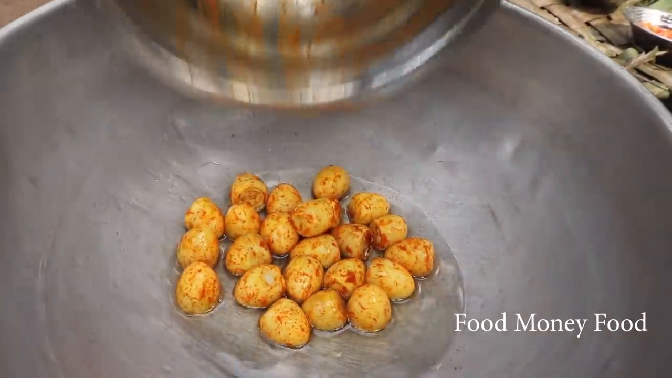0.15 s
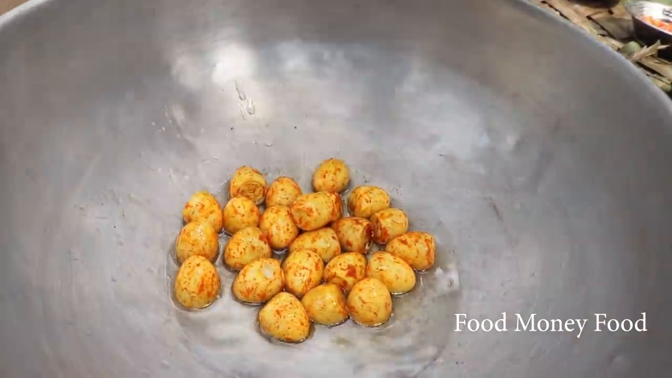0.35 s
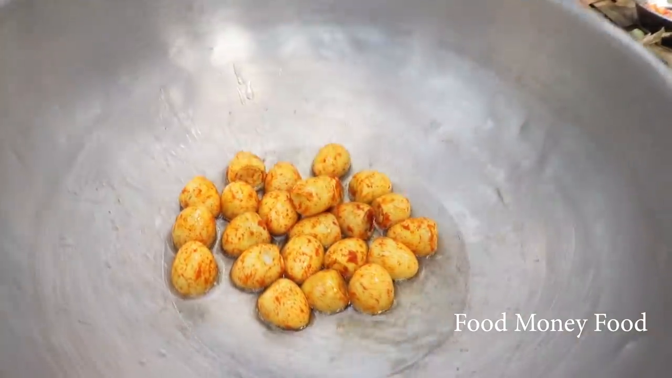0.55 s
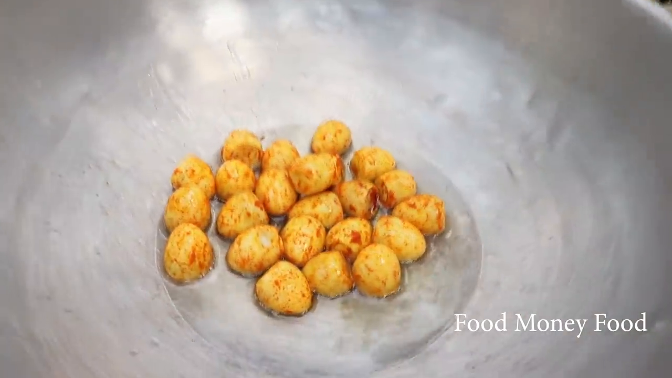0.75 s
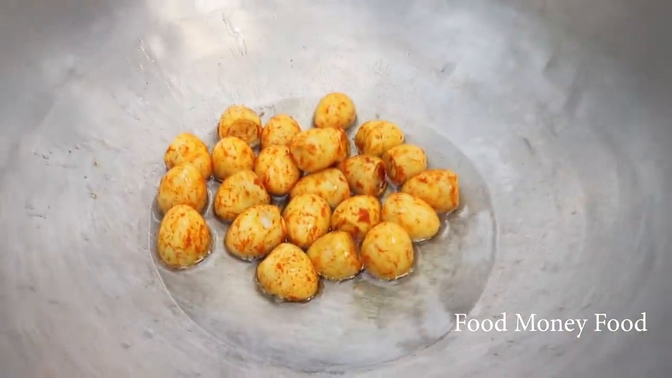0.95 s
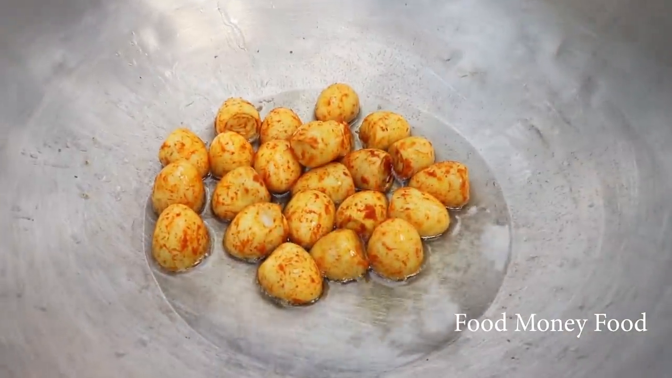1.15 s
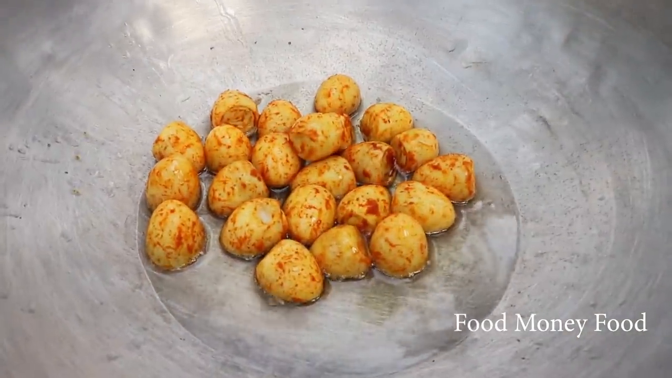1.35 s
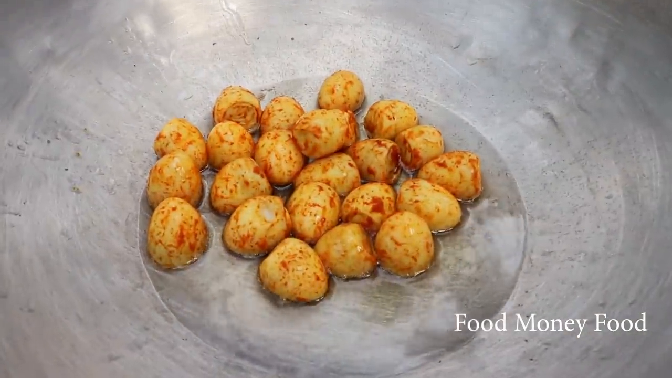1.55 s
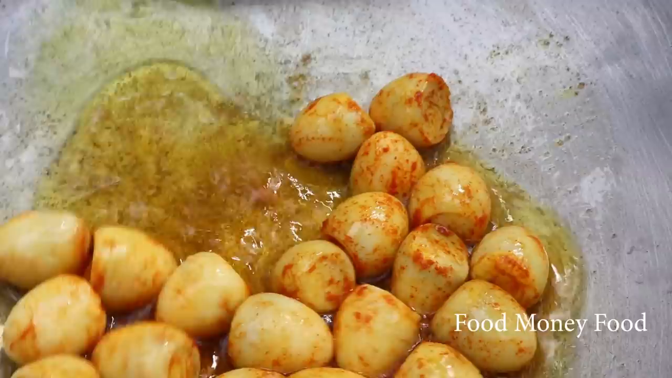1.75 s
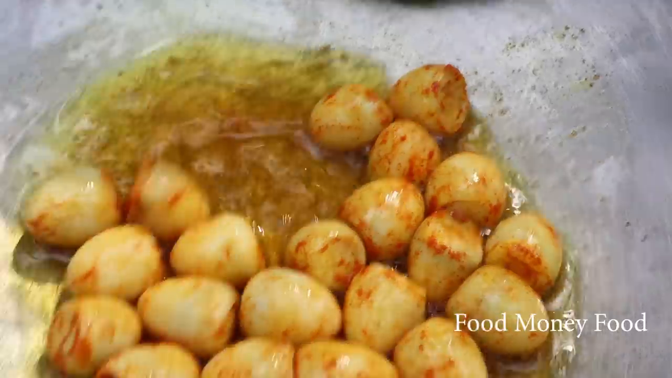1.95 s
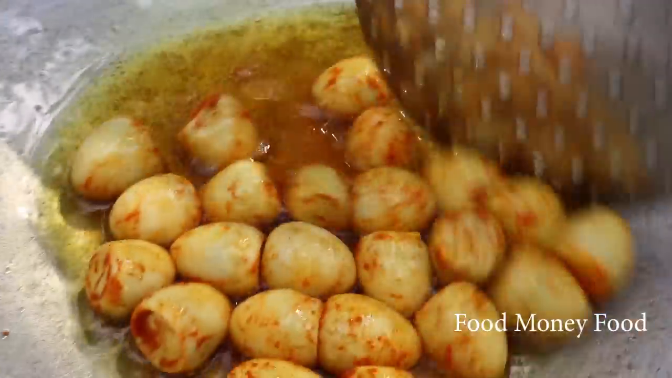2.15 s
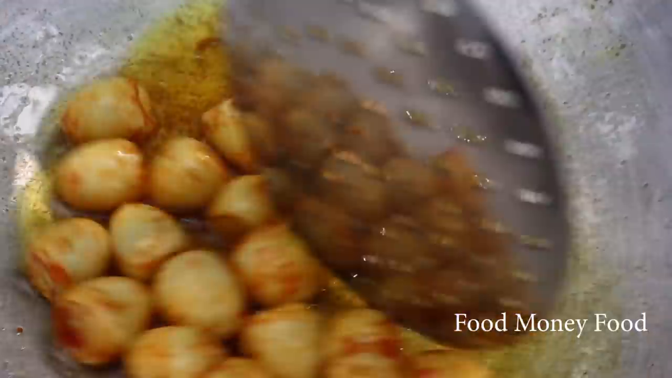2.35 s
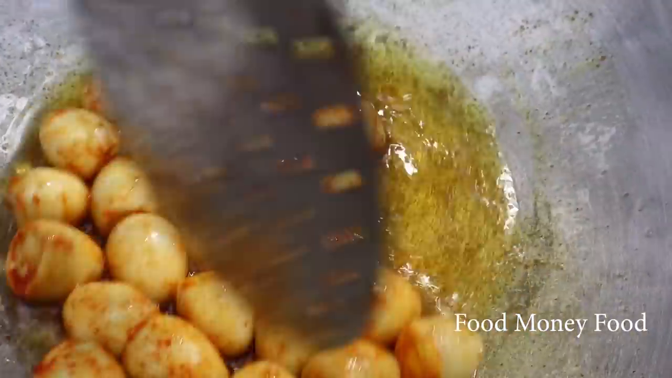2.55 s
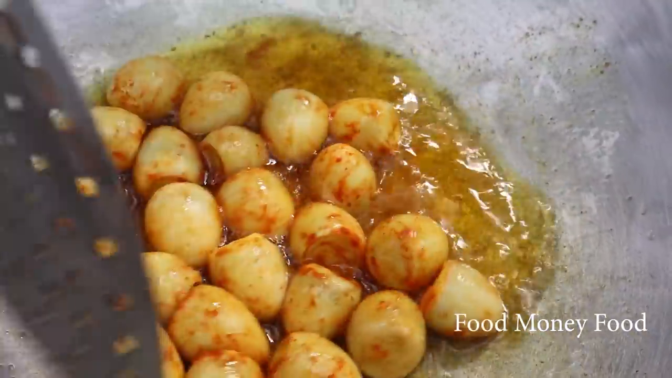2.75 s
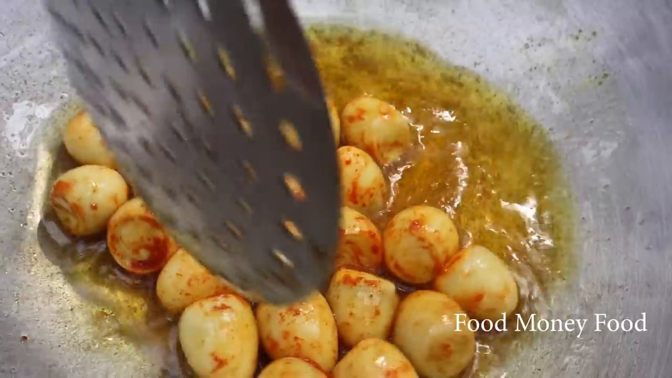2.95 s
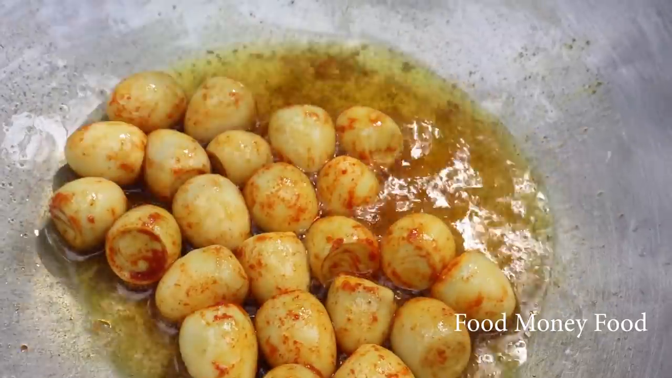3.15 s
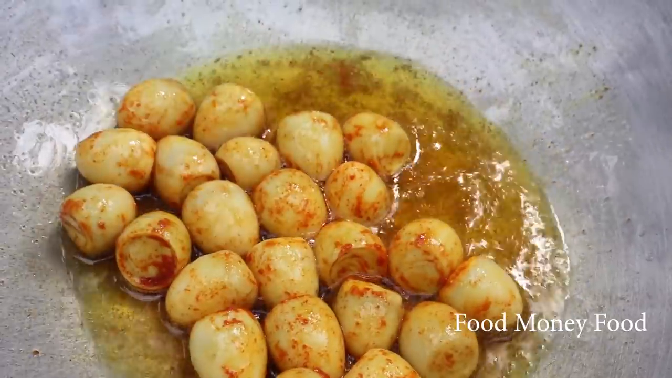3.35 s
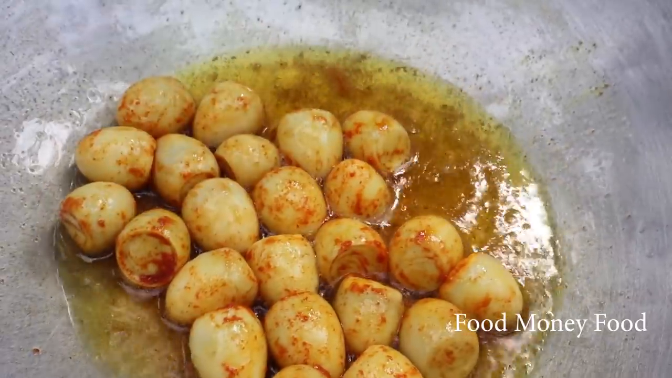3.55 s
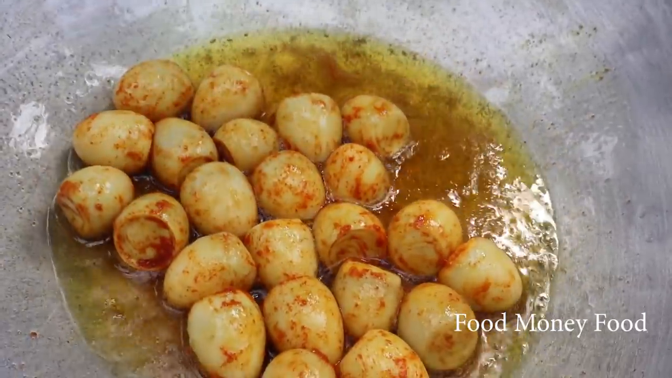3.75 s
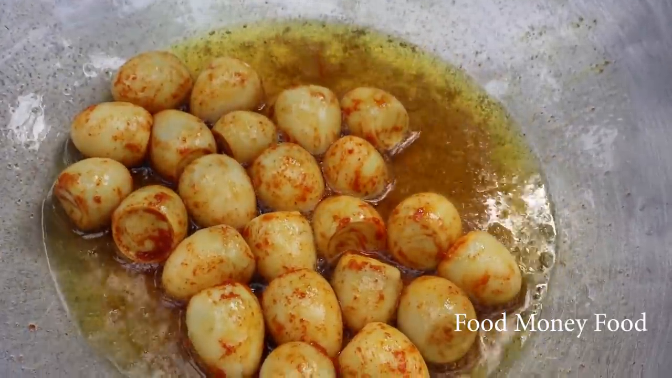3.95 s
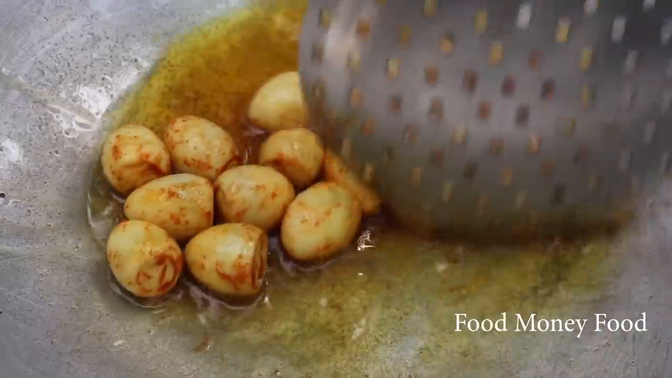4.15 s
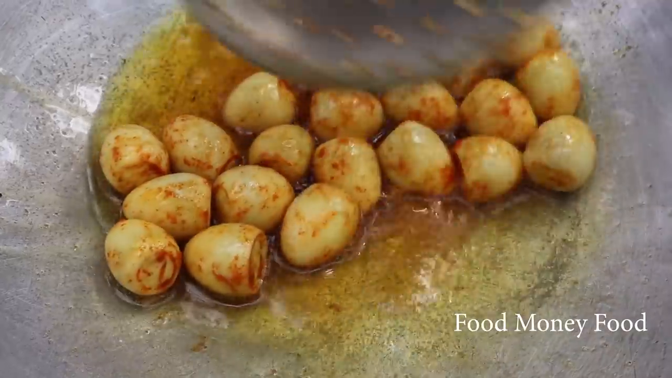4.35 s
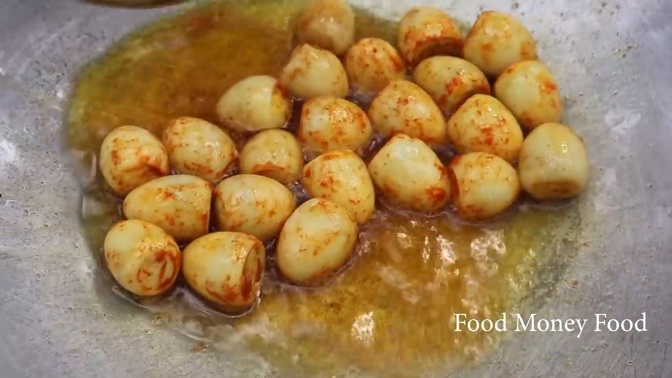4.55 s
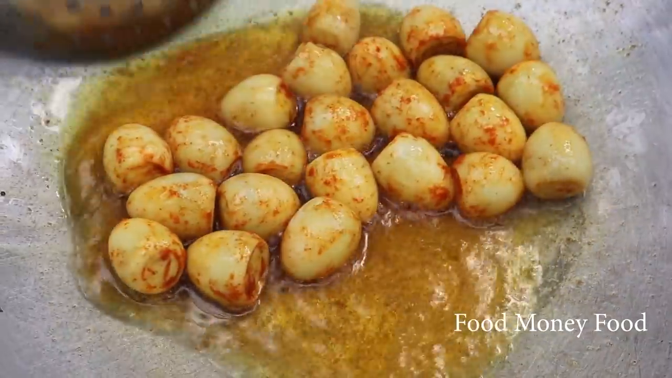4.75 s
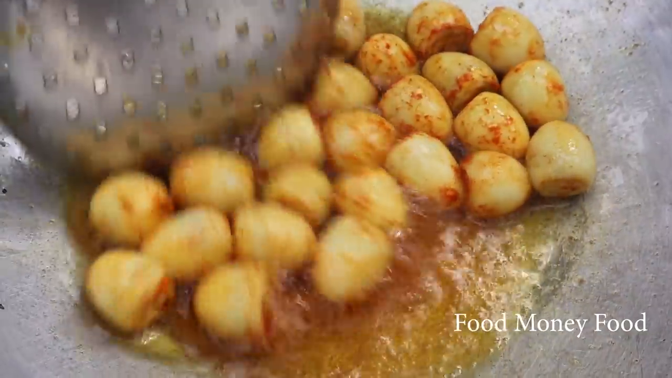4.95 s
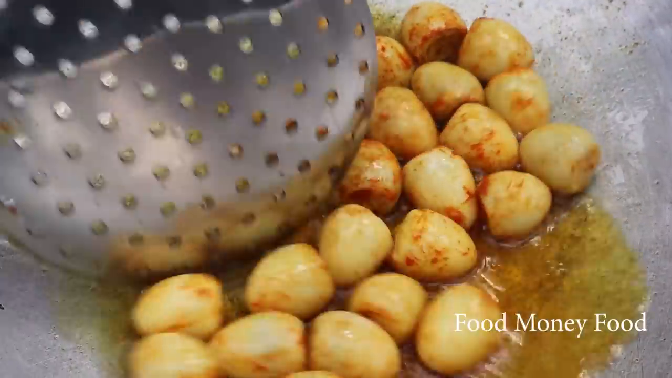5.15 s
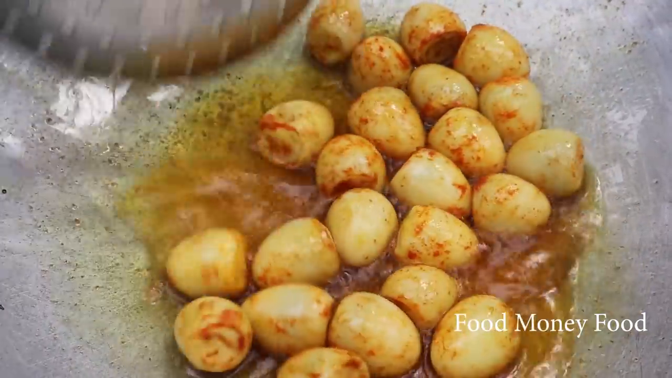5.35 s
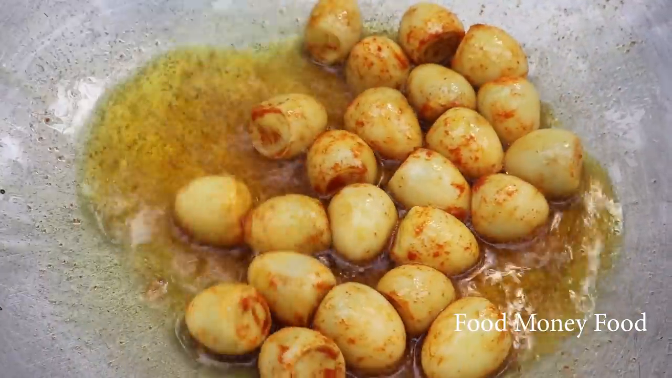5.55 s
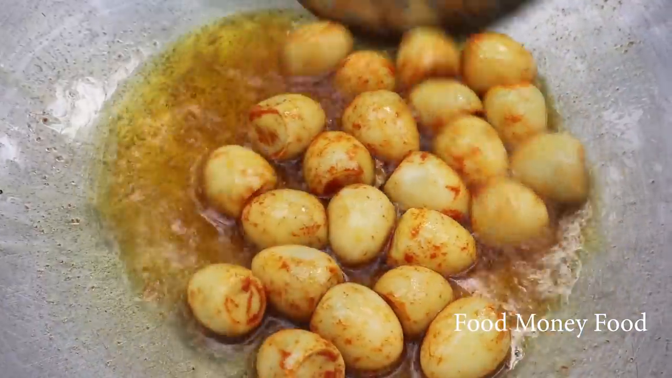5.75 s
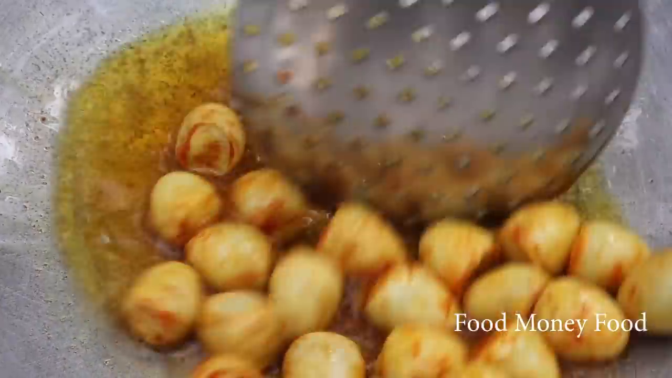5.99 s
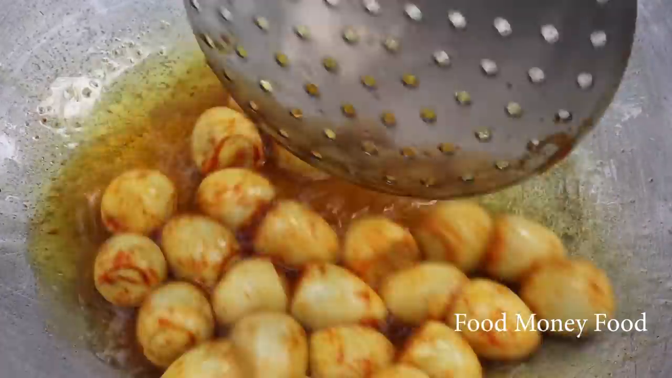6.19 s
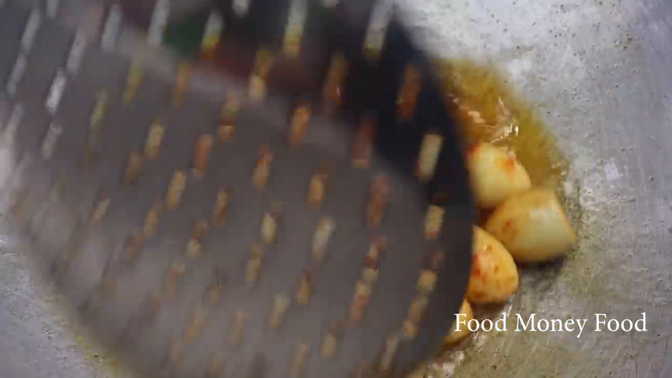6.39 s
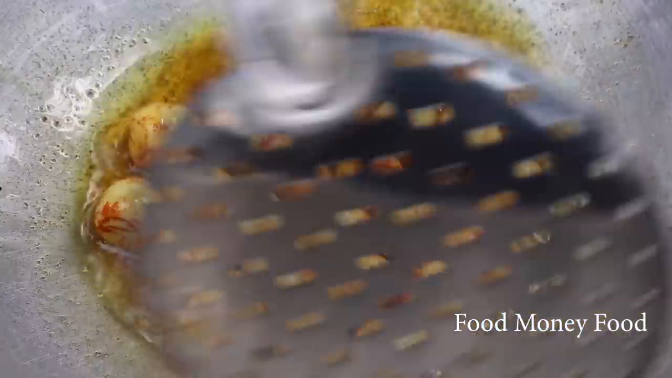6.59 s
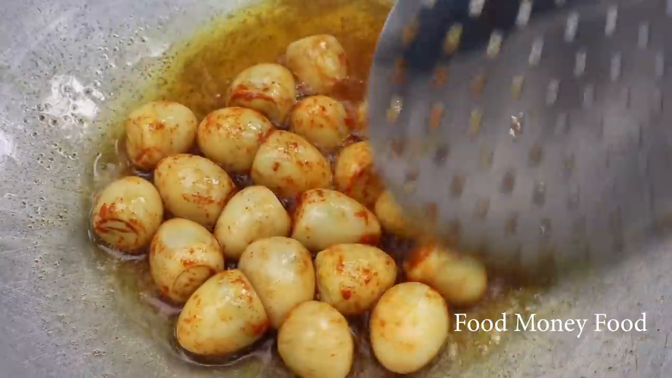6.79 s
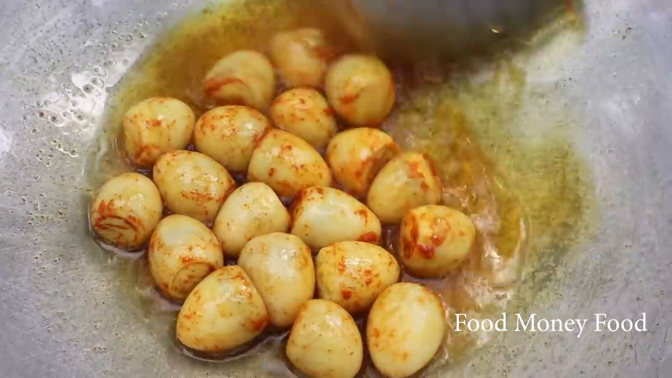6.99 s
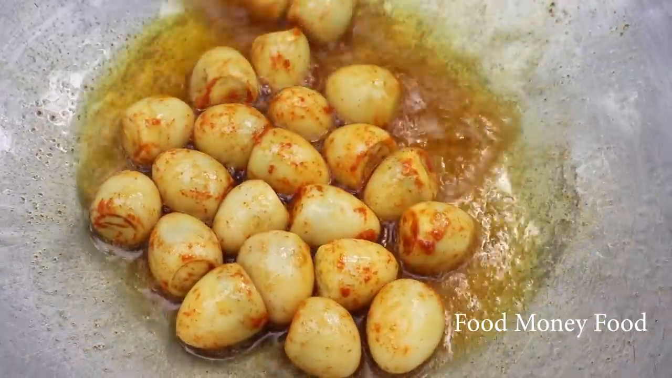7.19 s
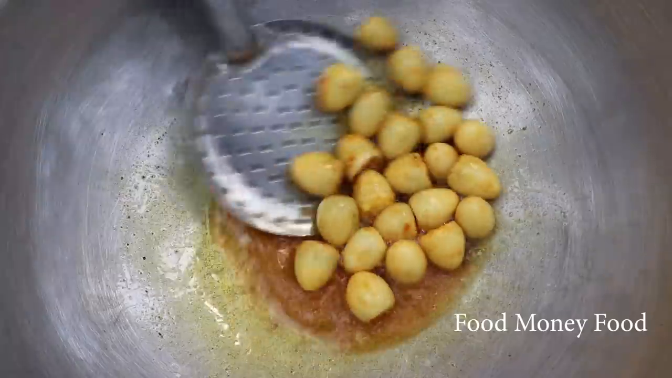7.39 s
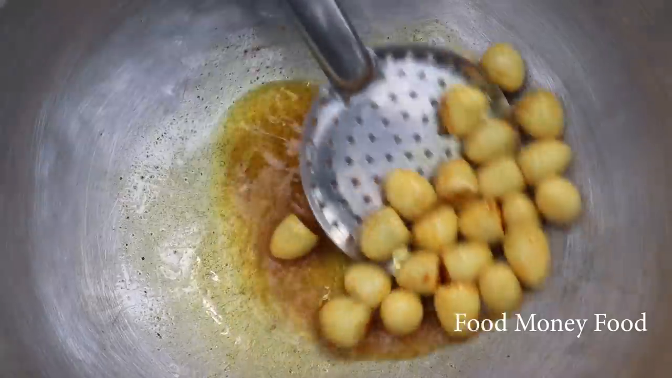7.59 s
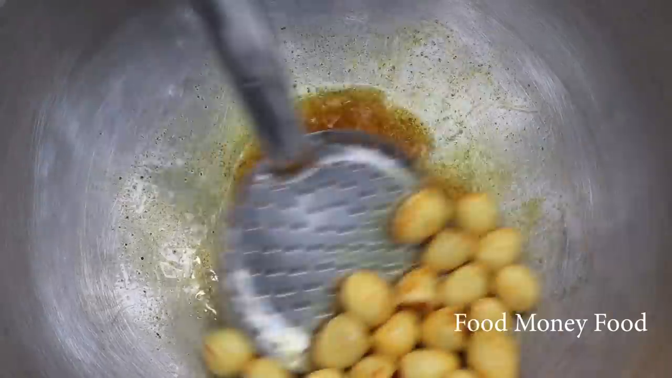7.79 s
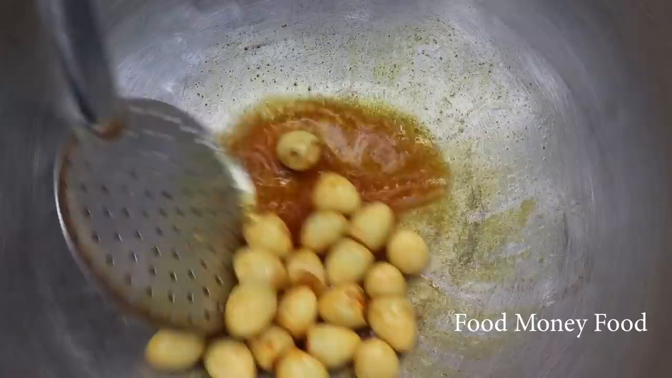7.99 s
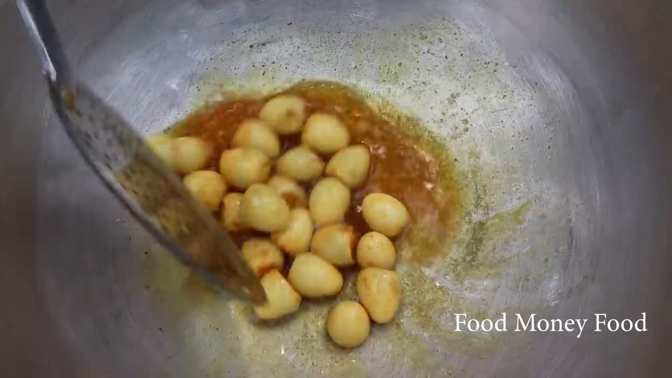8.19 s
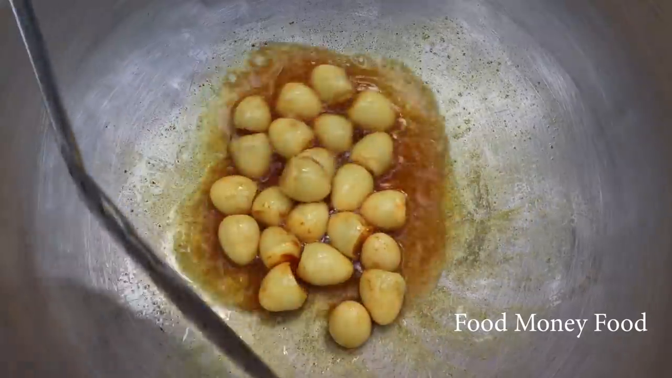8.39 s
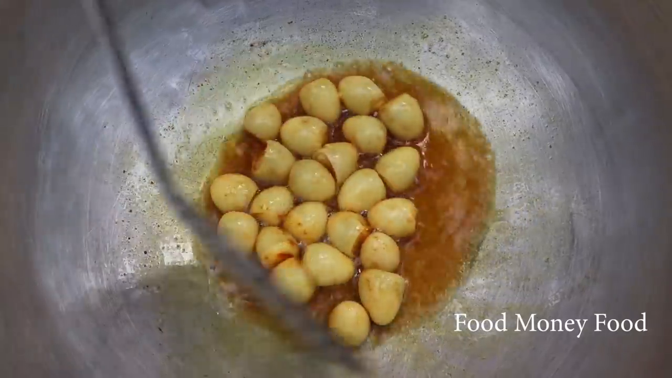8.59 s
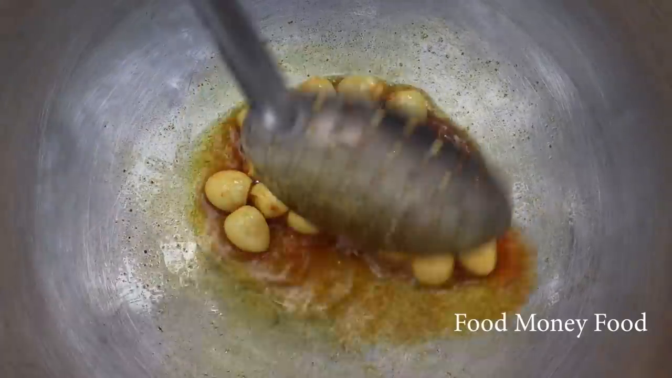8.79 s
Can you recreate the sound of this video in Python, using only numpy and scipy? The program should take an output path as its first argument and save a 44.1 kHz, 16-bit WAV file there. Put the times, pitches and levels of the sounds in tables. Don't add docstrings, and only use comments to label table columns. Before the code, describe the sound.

Outdoors, eggs fry in shallow oil in a wide metal pan. From 0 to 1.8 seconds the view is distant: fine crackling sizzle, bright bubble pops, soft wind, and a steel bowl's ring dying quickly at the start. At 1.8 the sound cuts close, with a sharp pop and a wind bump. At 1.94 a spoon knocks the pan with a dull boom and lingering steel ring; eggs roll and scrape until 2.4. Sizzle and scattered pops continue alone until a knock at 4.1, when frying flares. Hard knocks at 4.9 and 5.0 clip and duck the sizzle; another at 5.7 starts hollow egg thumps until 6.1. Two heavy knocks at 6.6 and 6.8 lead into strong rolling and a gritty scrape. From 7.4 to 8.1 come softer rolling, thumps, short scrapes and rattles, with sizzle flaring near 7.75. A final knock lands at 8.75.

```python
import sys
import numpy as np
from scipy import signal
from scipy.io import wavfile
from scipy.ndimage import uniform_filter1d

SR = 44100
rng = np.random.default_rng(int(sys.argv[2]) if len(sys.argv) > 2 else 0)


def master(y):
    cut = np.clip(np.atleast_2d(y).T, -1, 1)
    pcm = np.round(cut * 32767)
    wavfile.write(sys.argv[1], SR, pcm.astype(np.int16))


def gain_from_db(level_db):
    decades = np.asarray(level_db, float) / 20
    return 10 ** decades


N = 389403
SECONDS = np.arange(N) / SR
CUT_S = 1.79

# frequency in Hz, level in dB per Hz.
FAR_SPECTRUM = [(120, -20), (200, -24), (283, -9.5), (328, -0.5), (491, -8.5), (624, -13.5), (736, -6),
                (1140, -17), (1480, -6), (1980, -5), (2470, -11), (3980, 0), (4960, -11), (8440, -25.5),
                (16000, -48)]


def evened(x):
    return x / np.sqrt(np.mean(x ** 2) + 1e-20)


def curve(rows):
    s, *columns = np.transpose(rows)
    return [np.interp(SECONDS, s, c) for c in columns]


def add(mix, s, sound):
    part = mix[round(s * SR):][:len(sound)]
    part += sound[:len(part)]


def butter(x, order, hz, kind="lowpass"):
    return signal.sosfilt(signal.butter(order, hz, kind, fs=SR, output="sos"), x)


def colour(x, points, size=4096):
    hz, db = np.transpose(points)
    log_hz = np.log(np.fft.rfftfreq(size, 1 / SR) + 1)
    half = np.interp(log_hz, np.log(hz + 1), np.maximum(db, -80))
    log_gain = np.log(gain_from_db(np.r_[half, half[-2:0:-1]]))
    taps = np.fft.ifft(np.exp(np.conj(signal.hilbert(log_gain)))).real
    return evened(signal.oaconvolve(x, taps)[:N])


def resonate(x, modes):
    out = np.zeros(len(x))
    for k, (hz, width, db) in enumerate(modes):
        b, a = signal.iirpeak(hz, hz / width, SR)
        out += (-1) ** k * gain_from_db(db) * signal.lfilter(b, a, x)
    return evened(out)


def slow(hz):
    return evened(butter(rng.standard_normal(N), 2, hz))


def clicks(per_s, spread_db):
    size = gain_from_db(spread_db * np.minimum(rng.exponential(1, N), 4)) * rng.choice([-1., 1.], N)
    return size * (rng.random(N) < per_s / SR)


def bubble(hz, cycles, glide):
    u = np.arange(int(3 * cycles * SR / hz) + 8) * hz / SR / cycles
    tone = np.sin(2 * np.pi * cycles * (u + glide * u ** 2 / 2))
    return tone * (1 - np.exp(-6 * u)) * np.exp(-2 * u)


def pan_tail(x, t60=0.02, wet_db=0.5):
    t = np.arange(2000) / SR
    tail = rng.standard_normal(len(t)) * gain_from_db(-60 * t / t60) * (t > .0008)
    return x + gain_from_db(wet_db) * signal.oaconvolve(x, tail / np.linalg.norm(tail))[:len(x)]


def background_dip():
    # start in seconds, length in seconds, depth.
    dips = [
        (1.957, .4, 1.06),
        (4.125, 0.1, 0.36),
        (5.02, 0.11, 0.88),
        (5.713, 0.35, 0.89),
        (6.618, 0.44, 0.38),
        (7.402, .16, 1.85),
        (8.75, 0.057, 1.4),
    ]
    over = np.zeros(N)
    for s, length, depth in dips:
        add(over, s, np.full(round(length * SR), depth))
    return uniform_filter1d(over, size=1500)


def strokes_of(rows, sag_db=-2.5):
    rise_s, fall_s = 0.03, 0.066
    out = np.zeros(N)
    for start, length, db in rows:
        t = np.arange(0, length, 1 / SR)
        shape = np.minimum(t / rise_s, 1) * np.minimum((length - t) / fall_s, 1)
        add(out, start, shape ** 1.02 * gain_from_db(db + sag_db * t / length))
    return out


def air():
    # frequency in Hz, level in dB per Hz.
    murmur = [(200, -21), (450, -4.5), (800, 3), (1200, -4), (2500, -23)]
    return gain_from_db(-44 - 4.3 * (SECONDS < CUT_S)) * colour(rng.standard_normal(N), murmur)


def sizzle():
    # time in seconds, vigour in dB.
    vigour = [(0.0, -23), (0.5, -26.5), (1.72, -26.5), (2.3, -29), (2.5, -27), (3.42, -30.5), (4.12, -29.5),
              (4.3, -23.5), (4.75, -26.5), (5.1, -25.5), (5.55, -27), (5.95, -28), (6.22, -25),
              (6.9, -28.5), (7.35, -30.5), (7.75, -22.5), (8.09, -28.5), (8.83, -34)]
    # frequency in Hz, level in dB per Hz.
    near_spectrum = [(120, -22.5), (200, -8.5), (322, -7), (424, 6.5), (529, -7), (709, -12), (807, -17),
                     (1370, -1.5), (3020, -2), (4210, 4), (4870, -9), (7700, -15.5), (11500, -23.5),
                     (14900, -33), (16000, -36)]
    fizz_db = (-42, -34.5, -32)
    fizz_per_db = (1.87, 2.37, 0.3)
    last_view_s, calm_db, dip_fizz_db = 6.6, -28, -4.5
    bubbles_per_s, snaps_per_s, snaps_db, hiss_db = 2200, 120, -9, -2.0

    clump = gain_from_db(1.16 * slow(25) + 0.99 * slow(6.5) + 1.8 * slow(110))
    fizz = np.zeros(N)
    pitches = np.geomspace(500, 14500, num=24)
    for hz in pitches:
        grain = pan_tail(np.pad(bubble(hz, 2.55, 0.15), (0, 1200)), 70 / hz, -1.0)
        grain /= np.linalg.norm(grain)
        births = clicks(bubbles_per_s / len(pitches) * clump, 5.55)
        fizz += np.sqrt(hz) * signal.oaconvolve(births, grain)[:N]
    spatter = rng.standard_normal(90) * np.hanning(90) ** 0.53
    snaps = signal.oaconvolve(clicks(snaps_per_s * clump, 4.0), spatter)[:N]
    hiss = clump * rng.standard_normal(N)
    drive = evened(fizz) + gain_from_db(snaps_db) * evened(snaps) + gain_from_db(hiss_db) * hiss

    near = np.clip((SECONDS - CUT_S) / 0.03, 0, 1)
    crackle_db = curve(vigour)[0]
    view = np.searchsorted([CUT_S, last_view_s], SECONDS)
    top_db = np.take(fizz_db, view) + np.take(fizz_per_db, view) * (crackle_db - calm_db)
    top_db += dip_fizz_db * background_dip()
    body_filter = signal.butter(2, 6800, fs=SR, output="sos")
    out = np.zeros(N)
    for points, share in ((FAR_SPECTRUM, 1 - near), (near_spectrum, near)):
        x = colour(drive, points)
        body = signal.sosfiltfilt(body_filter, x)
        out += share * (gain_from_db(crackle_db - 0.5) * evened(body) + gain_from_db(top_db + 2.0) * evened(x - body))
    return out


def bowl():
    # frequency in Hz, width in Hz, level in dB.
    bowl_modes = [(734, 76, 0), (950, 35, 3.5), (1290, 78, 7), (1520, 78, -10)]
    return gain_from_db(-28.5 - 45 * SECONDS) * resonate(rng.standard_normal(N), bowl_modes)


def wind():
    # time in seconds, level in dB.
    strength = [(0.0, -39), (0.64, -37.5), (1.79, -37.5), (1.84, -24.5), (2.0, -34), (2.43, -31),
                (2.9, -30.5), (4.1, -27.5), (4.22, -33.5), (4.7, -32.5), (5.41, -23), (5.68, -25.5),
                (5.95, -35.5), (6.24, -29.5), (6.75, -30), (7.23, -22.5), (7.45, -31), (8.83, -33)]
    # frequency in Hz, level in dB per Hz.
    gust = [(8.8, -39), (15, 0.5), (75, -1), (234, -9.5), (280, -12.5), (363, -8.5), (400, -13), (520, -29),
            (880, -120)]
    dip_wind_db = -5.5
    lumps = rng.standard_normal(N) * gain_from_db(2.0 * slow(13.0))
    return gain_from_db(curve(strength)[0] + dip_wind_db * background_dip()) * colour(lumps, gust, size=16384)


def pops():
    # time in seconds, peak in dB, pitch in Hz, pan answer in relative dB.
    far_pops = [(0.114, -12.5, 3870, -11), (0.178, -11.5, 3800, -11.5), (0.393, -7.5, 3770, -20),
                (0.494, -11, 3960, -13), (0.678, -13.5, 4180, -10), (0.778, -8, 3280, -9),
                (0.803, -15, 3720, -26), (0.898, -8, 3940, -26.5), (1.063, -11, 4220, -25),
                (1.181, -4.5, 3630, -13.5), (1.274, -10, 4150, -9.5), (1.32, -8, 4060, -12),
                (1.465, -14, 4320, -30), (1.515, -7, 3760, -5.5), (1.535, -6, 4000, -18),
                (1.598, -7, 3970, -11.5)]
    # time in seconds, peak in dB, pitch in Hz.
    near_pops = [(1.849, 0, 4330), (2.715, -6, 4100), (2.8905, -6.5, 4050), (3.318, -5, 3870),
                 (3.412, -7, 3950), (3.607, -5.5, 4140), (3.714, -7.5, 4240), (3.7556, -11.5, 1360),
                 (3.8414, -8.5, 4230), (4.0677, -8, 4800), (4.2048, -3, 3700), (7.6282, -6.5, 3710),
                 (4.4348, -1, 7350), (4.7604, -6, 4330), (4.839, -5.5, 4670), (5.1721, -4, 4130),
                 (5.3057, -2.5, 4080), (5.3566, -7, 3950), (5.416, -7.5, 3700), (5.532, -4.5, 4220),
                 (7.7247, -1.5, 3900), (6.401, -6, 3660), (6.5826, -7.5, 3980), (6.721, -4, 4120),
                 (6.7338, 2, 4050), (7.0843, -11, 3880), (7.089, -14.5, 1430), (7.79, -4, 3950),
                 (7.9673, -3.5, 4470), (8.0584, -5.5, 4410)]
    spray_db, far_spray_db, spray_spread_db = -11, -20, 4.5

    when, size, tune = rng.random((42, 3)).T - .5
    small_s = CUT_S + (when + .5) * (N / SR - CUT_S)
    small = zip(small_s, -15 + 7 * size, 4100 * (1 + 0.5 * tune))
    bursts = list(small) + far_pops + near_pops
    thrown_db = spray_spread_db * (rng.random(len(bursts)) - .5)
    spray = butter(rng.standard_normal((len(bursts), 900)), 2, [6000, 12000], "bandpass")

    out, taps, t = np.zeros(N), np.zeros(N), np.arange(900) / SR
    for (s, db, hz, *pan_db), drops, more_db in zip(bursts, spray, thrown_db):
        burst = bubble(hz, 3.46, 0.011)
        burst = np.pad(burst, (0, 1800 - len(burst)))
        drops_db = (far_spray_db if pan_db else spray_db) + more_db
        burst[:900] += gain_from_db(drops_db) * drops * np.exp(-t / 0.00024)
        add(out, s, gain_from_db(db + 6.0) * pan_tail(burst))
        add(out, s - .0018, gain_from_db(db - 10) * burst)
        if pan_db:
            tap = rng.standard_normal(200) * np.exp(-t[:200] / 0.0017)
            add(taps, s, gain_from_db(db + pan_db[0]) * tap)
    answer = colour(taps, [row for row in FAR_SPECTRUM if row[0] < 2600] + [(3200, -69)])
    return out + gain_from_db(2.5) * answer * np.abs(taps).max() / np.abs(answer).max()


def knock(blow_db, hz, contact, pan_db):
    # frequency in Hz, level in dB, t60 in seconds.
    pan_modes = [(427, 6, 0.23), (356.6, 2.5, 0.081), (506, -17, 0.14), (612, -11, 0.084)]
    t = np.arange(SR // 2) / SR
    thud = np.sin(2 * np.pi * hz * t)
    thud += 0.35 * np.sin(2 * np.pi * 1.438 * hz * t)
    thud += 0.3 * np.sin(2 * np.pi * 2.074 * hz * t)
    thud *= np.exp(-(t / contact) ** 2)
    crack = butter(rng.standard_normal(len(t)), 1, [600, 5000], "bandpass")
    crack *= gain_from_db(-29 + 3500 * contact) * np.exp(-t / (0.68 * contact))
    hum = sum(gain_from_db(db - 60 * t / t60) * np.sin(2 * np.pi * f * t) for f, db, t60 in pan_modes)
    return gain_from_db(blow_db) * (thud + crack) + gain_from_db(pan_db) * np.clip(t / 0.0039, 0, 1) * hum


def knocks():
    # time in seconds, blow in dB, thud in Hz, contact in seconds, pan ring in dB.
    blows = [(1.9367, 14, 471, 0.0068, -2.5), (1.958, -5, 446, 0.0058, -21),
             (2.0672, 0.5, 420, 0.0051, -28), (2.397, -15, 400, 0.004, -28.5),
             (4.1116, 6.5, 451, 0.0048, -11.5), (4.9046, 22, 385, 0.0038, -15),
             (4.927, -8, 603, 0.0026, -7.5), (5.0173, 17, 420, 0.004, -11), (5.186, -13.5, 463, 0.004, -29),
             (5.6922, 13, 363, 0.0081, -11.5), (5.7425, -2, 724, 0.0061, -13),
             (6.6078, 24, 423, 0.0046, -25), (6.627, 3, 377, 0.0028, -9.5), (6.7739, 22, 443, 0.0037, -7),
             (6.788, 6.5, 356, 0.0037, -14), (7.927, -17.5, 478, 0.0059, -35),
             (7.986, -17.5, 463, 0.0044, -30), (8.752, 14.5, 430, 0.0027, -6.5)]
    out = np.zeros(N)
    for s, *blow in blows:
        add(out, s, knock(*blow))
    return out


def spoon():
    # start in seconds, frequency in Hz, level in dB, t60 in seconds, damped at seconds.
    ringing = [
        (1.94, 2207, -29, 3.0, 2.28),
        (1.94, 2995, -19, .9, 2.065),
        (1.94, 1540, -26, .1, 2.0),
        (5.70, 2995, -20, .5, 5.76),
        (5.70, 1560, -23, .2, 5.74),
        (6.61, 759, -25, 5.0, 6.77),
        (6.61, 2210, -31, 3.0, 6.77),
        (6.78, 2207, -32, 4.0, 7.08),
        (6.78, 2995, -34, .5, 6.9),
    ]
    out, t = np.zeros(N), np.arange(SR // 2) / SR
    for s, hz, db, t60, damped_s in ringing:
        waver = gain_from_db(2.7 * evened(uniform_filter1d(rng.standard_normal(len(t)), 900)))
        damping = 1 + np.exp((t + s - damped_s) / 0.008)
        add(out, s, gain_from_db(db - 60 * t / t60) * waver * np.sin(2 * np.pi * hz * t) / damping)
    return out


def rolling():
    # start in seconds, length in seconds, rolling in dB, knocking edge in relative dB.
    rolls = [
        (1.993, 0.37, -11.5, -9),
        (5.023, 0.14, -11, -11.5),
        (5.73, 0.36, -13.5, -7),
        (6.823, 0.25, -7.5, -20),
        (7.367, 0.18, -19.5, -20),
        (7.465, 0.26, -25.5, -24),
        (7.65, 0.19, -21.5, -6.5),
    ]
    # frequency in Hz, width in Hz, level in dB.
    hollow_modes = [(378.7, 58, 37), (420, 12, -25), (308, 67, -23)]
    # frequency in Hz, width in Hz, level in dB.
    edge_modes = [(600, 890, 6.5), (890, 590, 6)]
    bumps = clicks(260, 1.5) + 0.058 * rng.standard_normal(N)
    hollow = evened(butter(resonate(bumps, hollow_modes), 2, [240, 600], "bandpass"))
    edge = evened(butter(resonate(bumps, edge_modes), 2, 1300))
    out = hollow * strokes_of((s, length, db - 4.5) for s, length, db, _ in rolls)
    out += edge * strokes_of([(s, length, db + edge_db) for s, length, db, edge_db in rolls], -6.5)
    b, a = signal.iirpeak(417, 417 / 6.3, SR)
    return out + gain_from_db(-6) * signal.lfilter(b, a, out)


def scraping():
    # start in seconds, length in seconds, level in dB.
    scrapes = [
        (2.02, 0.2, -27),
        (5.738, 0.32, -32),
        (6.826, 0.18, -22.5),
        (7.37, 0.06, -33),
        (7.494, 0.11, -34),
        (7.646, 0.11, -24),
        (7.9, 0.18, -28.5),
    ]
    # start in seconds, length in seconds, level in dB.
    rattles = [
        (7.645, .13, -26),
        (7.77, .05, -26),
        (7.905, .04, -21),
    ]
    # frequency in Hz, width in Hz, level in dB.
    steel_modes = [(1530, 310, -8), (2360, 400, -20), (3030, 250, -1), (3720, 77, 12), (3950, 150, 5),
                   (4200, 260, 8), (5600, 250, 0)]
    # frequency in Hz, width in Hz, level in dB.
    rattle_modes = [(1210, 140, -1.5), (1386, 89, 1), (2020, 240, -13), (2540, 220, -5)]
    slips = clicks(2500, 3.4) * gain_from_db(4.1 * slow(36))
    steel, squeal = resonate(slips, steel_modes), resonate(slips, rattle_modes)
    squeal = evened(resonate(squeal, rattle_modes) + 0.39 * squeal)
    return gain_from_db(3.0) * steel * strokes_of(scrapes) + squeal * strokes_of(rattles)


def thumps():
    # time in seconds, peak in dB.
    eggs = [(2.179, -11), (2.222, -8), (2.26, -10), (5.763, -21), (5.789, -3), (5.834, -7), (5.85, -28.5),
            (5.909, -6.5), (5.946, -1.5), (6.003, -12), (6.028, -2), (6.877, -1), (6.934, -2), (6.976, -2),
            (7.379, -12), (7.404, 1), (7.439, 0), (7.49, -12.5), (7.528, -2), (7.59, -7.5), (7.66, -4.5),
            (7.753, -19)]
    out, t = np.zeros(N), np.arange(2600) / SR
    for (s, db), (a, b) in zip(eggs, rng.random((len(eggs), 2))):
        tone = np.sin(2 * np.pi * (350 + 80 * a) * t)
        tone += 0.48 * np.sin(2 * np.pi * (600 + 300 * b) * t) * np.exp(-t / 0.0079)
        add(out, s, gain_from_db(db - 4.5) * tone * (1 - np.exp(-t / 0.0033)) * np.exp(-t / 0.02))
    return out


def scene():
    mix = air() + sizzle() + bowl() + wind() + pops()
    mix += knocks() + spoon() + rolling() + scraping() + thumps()
    return mix[None]


def band_limit(x):
    return signal.sosfilt(signal.butter(12, 16200, fs=SR, output="sos"), x)


def record(dry):
    start_db, slope, recovery_db_s, edge_hz = -7, .55, 110, 15780
    power_db = 10 * np.log10(abs(uniform_filter1d(dry[0] ** 2, 200, origin=99)) + 1e-12)
    fall = SECONDS * recovery_db_s
    held_db = np.maximum.accumulate(power_db + fall) - fall
    over_db = np.maximum(held_db - start_db, 0)
    late = signal.lfilter([1 / 360.0], [1, 1 / 286.0 - 1], over_db)
    clipped = np.clip(dry / gain_from_db(slope * late), -1, 1)
    edge = signal.firwin(801, edge_hz, window=("kaiser", 9), fs=SR)
    return band_limit(signal.oaconvolve(clipped, edge[None], "same"))


dry = scene()
out = record(dry)
master(out)
```